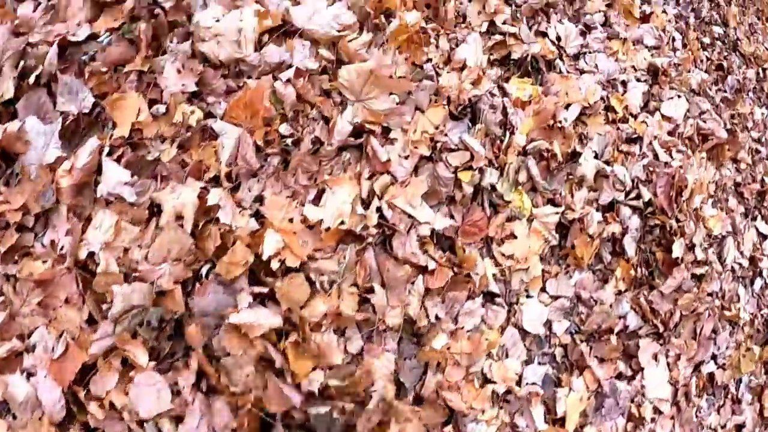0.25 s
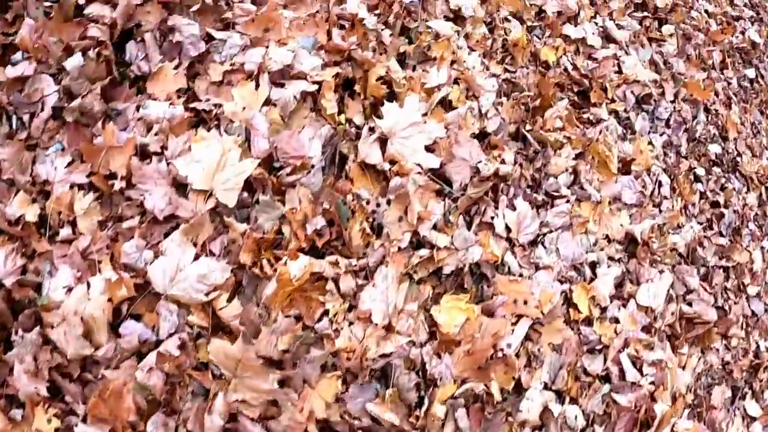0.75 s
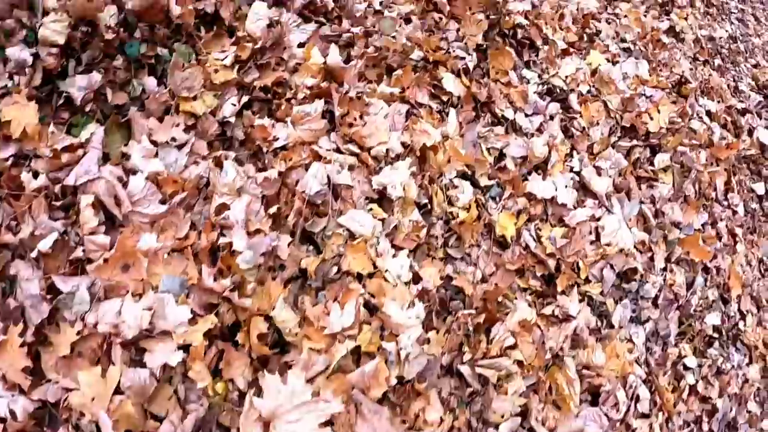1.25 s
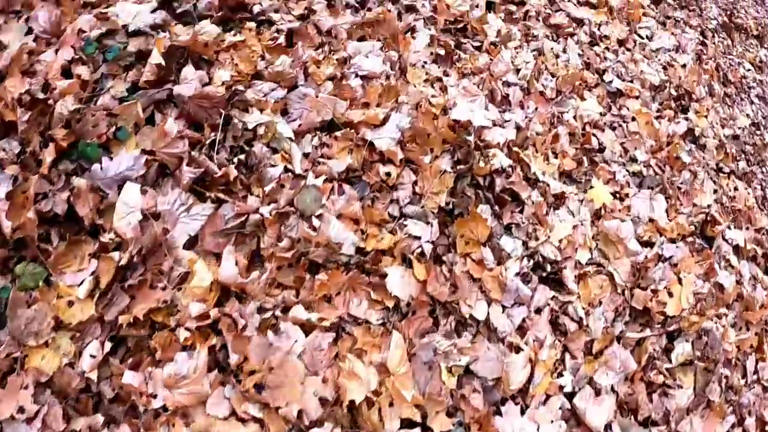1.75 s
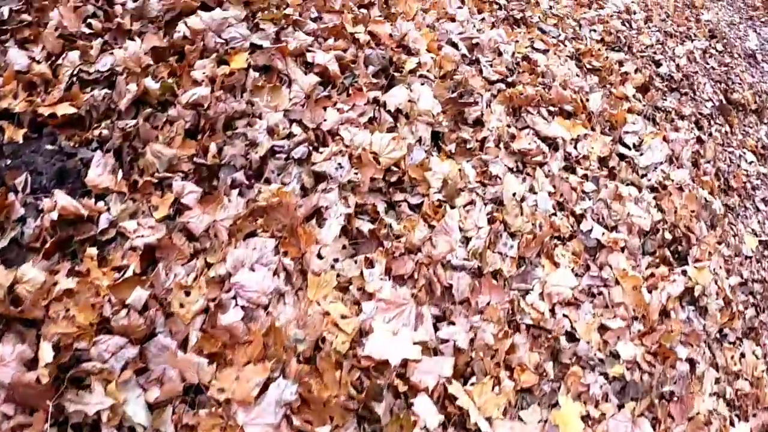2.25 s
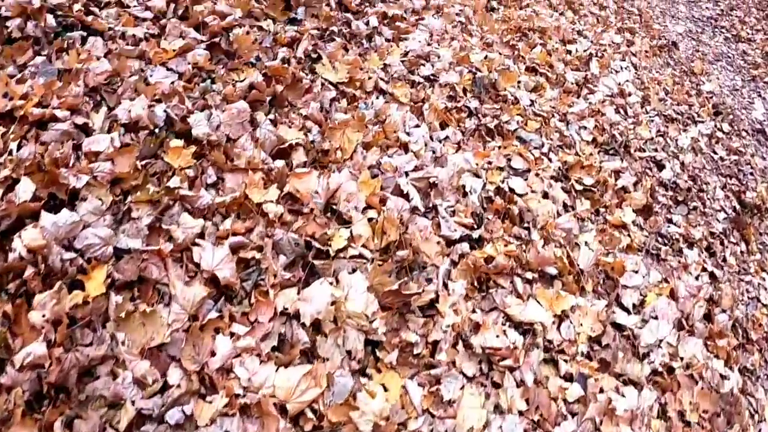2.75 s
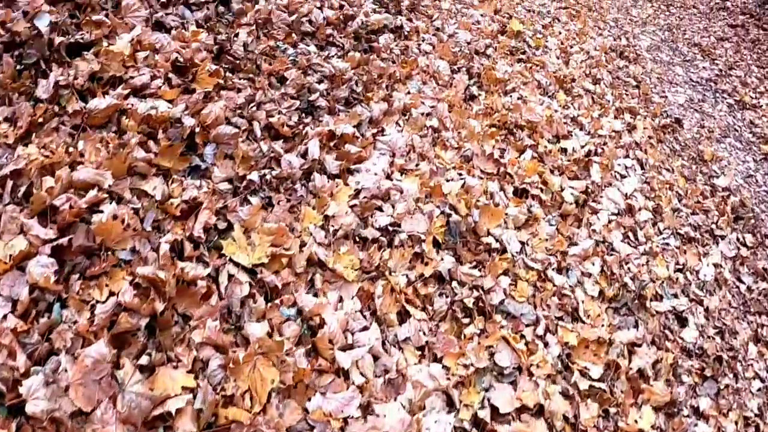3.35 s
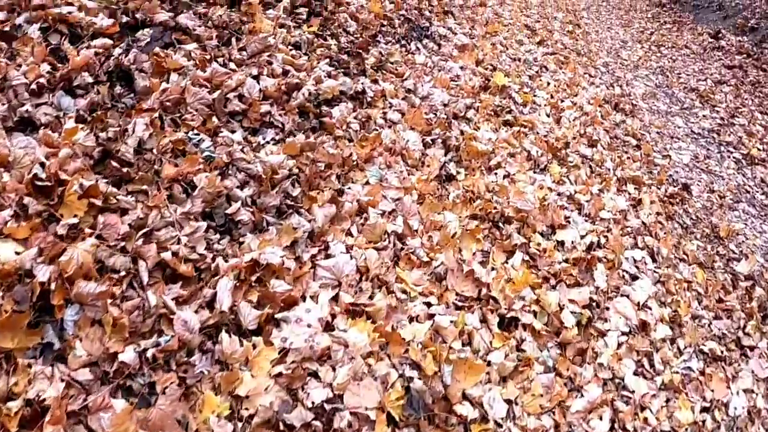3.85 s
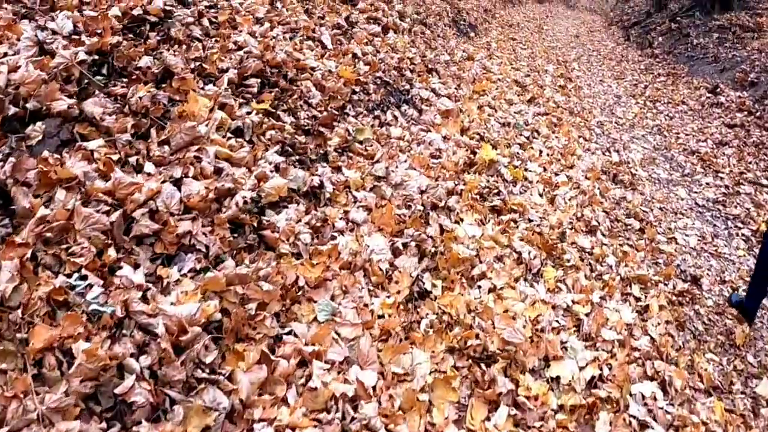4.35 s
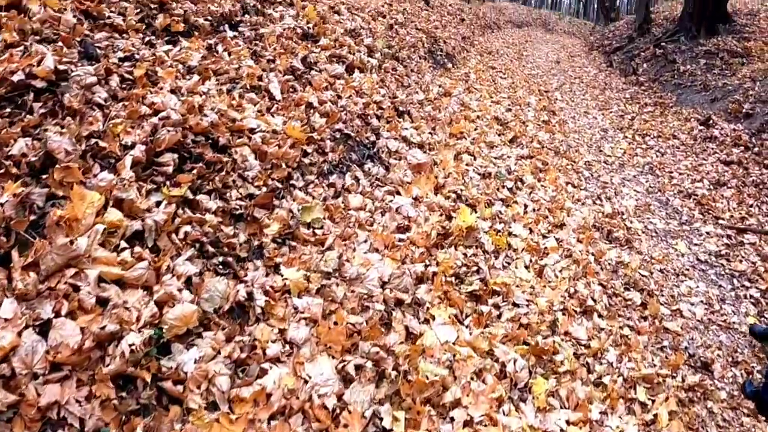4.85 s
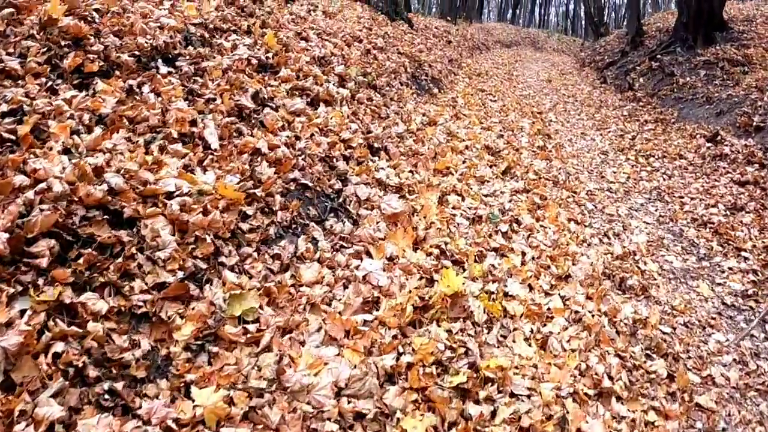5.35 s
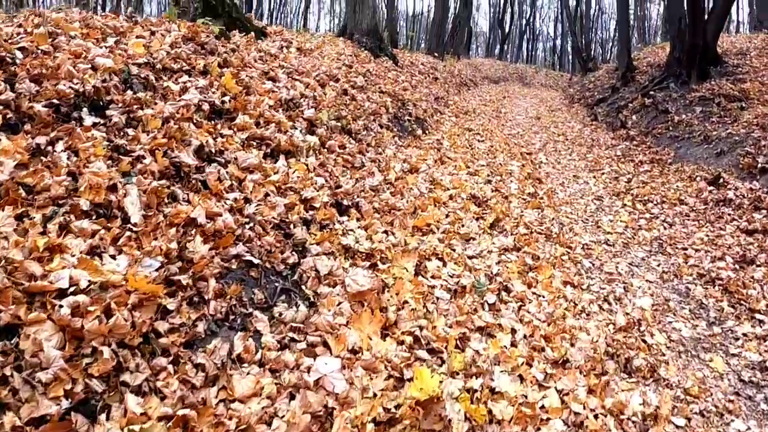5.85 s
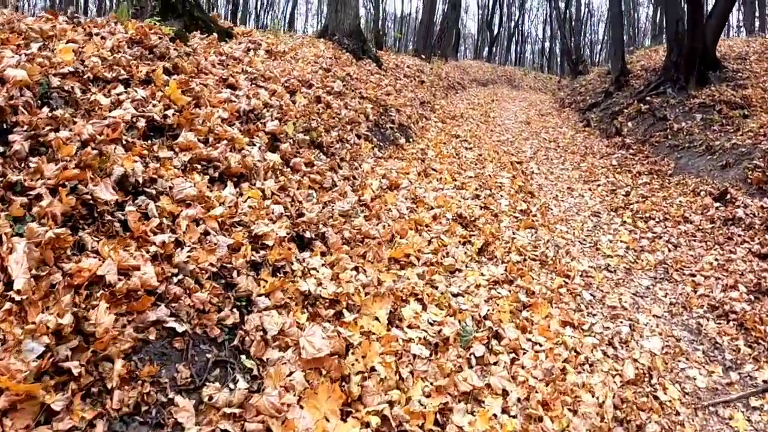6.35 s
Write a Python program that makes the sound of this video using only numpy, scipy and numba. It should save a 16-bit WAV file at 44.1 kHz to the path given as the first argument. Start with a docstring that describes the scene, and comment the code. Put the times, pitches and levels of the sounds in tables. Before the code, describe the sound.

Someone walks at an even pace through thick crisp fallen leaves, each step a swish and crunch, over a very faint low outdoor murmur.

```python
"""A forest path deep in dry leaves: someone walks along it at a fairly even pace, phone in hand.
Each step ploughs and crushes the layer: thousands of tiny fractures, each a short decaying ring, merge
into a rustle. Loose leaves tick, a dozen stalks snap, and dull low bumps sound as short cosine pulses.
Far-off engines drone as two wavering low tones, each with a weaker octave, under the quiet of the wood,
which is filtered noise. One soft low tone slides down late on."""
import sys
import numpy as np
from scipy import signal
from scipy.fft import rfft, irfft, next_fast_len
from scipy.io import wavfile
from numba import njit

SR = 44100
rng = np.random.default_rng(int(sys.argv[2]) if len(sys.argv) > 2 else 0)


def dump_mix(stems):
    """Bounce the given channels to the path in sys.argv[1] as a 16-bit WAV at rate SR."""
    frames = np.atleast_2d(stems).T  # one column per channel
    limited = np.clip(frames, -1, 1)  # hard clip at full scale
    pcm = np.round(limited * 32767).astype(np.int16)
    wavfile.write(sys.argv[1], SR, pcm)


N = 291501
TIME = np.arange(N) / SR  # s

# Spectrum of the murmur of the open air: (f/Hz, relative level/dB per Hz)
WOOD_SPECTRUM = [(15, -7), (28, -6), (50, 4), (100, 2), (200, -1), (320, -6), (500, -12), (1500, -28),
                 (6000, -16), (15000, -33)]
# Distant engines at rest: (t/s, firing rate f/Hz, relative level/dB)
IDLING = [(0, 38.7, -52), (.4, 39.4, -54.5), (1.6, 38.3, -64), (2.4, 38.5, -58), (4.4, 38.6, -50.5),
          (5, 39, -58), (5.5, 38.6, -52), (6.6, 39.5, -59)]
# Distant engines under load: (t/s, firing rate f/Hz, relative level/dB)
PULLING = [(3.5, 48.5, -52), (3.9, 49.7, -48.5), (4.3, 54.8, -44), (4.6, 59.6, -54.5), (4.9, 60.2, -55.5)]
# Dull low bumps, the first very faint: (t/s, level/dB, f/Hz)
BUMPS = [(2.86, -39, 90), (4.298, -24.5, 172)]
# Stalks and stiff leaves that snap: (t/s, relative level/dB, ring f/Hz)
SNAPS = [(0.359, -11.5, 2270), (0.501, -21.5, 3000), (1.117, -19, 1490), (1.333, -24, 1890),
         (1.612, -6, 2550), (1.834, -13, 2300), (2.709, -11, 2800), (3.314, -20, 2150), (3.886, -23, 3280),
         (4.936, -14, 2820), (5.348, -17, 2480), (6.271, -21, 960)]
# Spectrum of the rustling layer: (f/Hz, relative level/dB per Hz)
LEAF_SPECTRUM = [(41, -25), (70, -6), (110, -14), (196, -7.5), (344, -7.5), (504, -4.5), (863, -5.5),
                 (1130, -2.5), (1580, -2), (3310, -1.5), (4640, -2), (7100, -6.5), (8310, -10.5),
                 (12400, -21.5), (14900, -26.5)]
# How heavily the foot packs the leaves underneath: (t/s, low thud level/dB)
WEIGHT = [(0, -2.5), (4.4, 2), (6.6, 1.5)]
# How widely the moving leaves lie around the phone: (t/s, spread of directions 0-1)
SPREAD = [(0, 0.43), (3.75, 0.42), (4.05, 0.27), (6.6, 0.2)]
# Strides, in which the foot swings through the leaves, presses them down and leaves them:
# (start t/s, swing/s, press/s, relative level/dB at the start, on landing and at the end of the press,
#  release/s, crispness/dB on landing, crispness/dB once trodden)
STEPS = [(-0.2, 0.24, 0.22, -30, -25, -24.5, 0.11, 4, -1.5),
         (0.51, 0.24, 0.3, -44, -25, -26.5, 0.039, 2.5, -2.5),
         (1.17, 0.31, 0.25, -40.5, -22.5, -25, 0.093, -2, 0.3),
         (1.99, 0.15, 0.29, -42, -24.5, -27, 0.11, -1, -1),
         (2.599, 0.23, 0.27, -40.5, -24, -23.5, 0.09, -1.5, -0.5),
         (3.35, 0.2, 0.25, -45, -26, -27, 0.075, 1, -0.2),
         (4.03, 0.3, 0.21, -40, -26.7, -27, 0.067, 0.5, -2),
         (4.76, 0.18, 0.29, -44, -33, -26.5, 0.066, 3.5, -1),
         (5.58, 0.092, 0.31, -44, -30.5, -29, 0.069, 2.5, 0.5),
         (6.268, 0.21, 0.24, -42.5, -29, -26.5, 0.06, 0.5, 3)]
# Short flicks of a toe or heel at the edges of the steps: (t/s, half length/s, relative level/dB)
FLICKS = [(0.41, 0.028, -30.5), (1.131, 0.018, -31), (1.83, 0.013, -35), (1.994, 0.041, -35),
          (2.45, 0.011, -32.5), (3.495, 0.015, -34), (3.82, 0.012, -34.5), (4.654, 0.041, -33.5),
          (5.28, 0.013, -31), (5.363, 0.02, -35), (5.529, 0.04, -39), (6.102, 0.017, -34)]
# Leaves that go on stirring between the steps: (t/s, relative level/dB)
STIRRING = [(0.5, -45), (1.2, -42.5), (3.3, -39.5), (4, -44), (6.6, -45)]
# Direction of the rustle as the phone slowly turns: (t/s, left minus right level/dB)
TURN = [(0, 3), (0.9, 2), (3.7, 3.5), (4.4, 4), (6.6, 4.5)]
# Swing of the rustle to the left as a foot comes forward: right foot, left foot (level/dB)
FOOT_PAN_DB = [1.0, 2]
# Colour of the two microphone ports: (f/Hz, level/dB)
LEFT_PORT = [(300, -2.5), (1000, 1.5), (1500, 0.37), (2500, 2), (5500, -1), (7100, -0.5), (8050, -9.5),
             (9500, 2), (12400, 2.8), (14000, 0)]
RIGHT_PORT = [(300, -1.5), (1000, 0.9), (1500, -1.3), (2500, -1.5), (5500, 0.3), (7600, 2), (8200, 0),
              (9800, 1), (12400, 3.5), (14000, 2.5)]

PAN_WAIT_S, PAN_RISE_S, PAN_FALL_S = 0.082, 0.15, 0.5  # counted from the end of the press before
LIFT_S, FRESH_DB = 0.02, 0.4  # fade-in and crispness of the leaves as the foot lifts
TRODDEN_LAG_S = 0.078  # the leaves lie flattest just after the press
BODY_PRESS_DB, BODY_SWING_DB = 0.02, -1.3  # body of the layer under full weight, with the foot in the air
RELEASE_BEND = 1.14  # above 1 the rustle dies ever faster as the foot leaves
TOP_HZ = 14900


def undb(db):
    """Level law: decibels to amplitude gain."""
    return 10 ** (np.asarray(db) / 20)


def unit(x):
    """Normalisation: scale to rms 1."""
    return x / np.sqrt(np.mean(x ** 2))


def curves(table):
    """Linear interpolation: the columns of a table, joined by straight lines in time."""
    s, *columns = np.transpose(table)
    return [np.interp(TIME, s, c) for c in columns]


def walk(per_s):
    """Random modulation: Gaussian values drawn per_s times a second, joined by straight lines."""
    knots = np.arange(0, TIME[-1] + 1, 1 / per_s)
    return np.interp(TIME, knots, rng.standard_normal(len(knots)))


def band(x, lo_hz, hi_hz):
    """Zero-phase filtering: a band-pass run forwards and backwards."""
    edges = [lo_hz, min(hi_hz, SR / 2 - 1)]
    return signal.sosfiltfilt(signal.butter(2, edges, "band", fs=SR, output="sos"), x)


def colour(x, points):
    """Minimum phase: a causal filter with the given (f/Hz, level/dB) response, by way of the cepstrum."""
    hz, db = np.transpose(points)
    size = 2 * next_fast_len(N)
    bins = np.maximum(np.arange(size // 2 + 1) * SR / size, 1)
    response_db = np.interp(np.log(bins), np.log(hz), db)
    cepstrum = irfft(np.log(undb(response_db)))
    # folding the cepstrum onto positive times makes the filter causal
    cepstrum[1:size // 2] *= 2
    cepstrum[size // 2 + 1:] = 0
    return irfft(rfft(x, size) * np.exp(rfft(cepstrum)))[..., :N]


@njit
def grains(start, hz, cycles, size):
    """Damped oscillation: a sum of rings; start in samples, cycles until 1 / e."""
    out = np.zeros(N)
    for k in range(len(start)):
        decay = hz[k] / (cycles[k] * SR)
        pole = 2j * np.pi * hz[k] / SR - decay
        first = int(np.ceil(start[k]))
        z = size[k] * np.exp(pole * (first - start[k]))
        p = np.exp(pole)
        for i in range(max(first, 0), min(N, first + int(5 / decay) + 1)):
            out[i] += z.imag * min((i - start[k]) / 3, 1.)  # onset over three samples
            z *= p
    return out


def wood(level_db=-54, side_db=-9, buffet_db=-59):
    """Diffuse field: a low murmur of open air, and slight buffeting of the moving phone, separate at each port."""
    mid, side = unit(colour(rng.standard_normal((2, N)), WOOD_SPECTRUM))
    murmur = mid + undb(side_db) * np.array([side, -side])
    buffet_spectrum = [(10, 0), (25, 0), (60, -7), (150, -21), (1000, -60)]
    buffet = unit(colour(rng.standard_normal((2, N)), buffet_spectrum))
    return undb(level_db) * murmur + undb(buffet_db) * buffet


def engine(table, gain_db, second_db, fade_s, waver_db):
    """Propagation: only the firing tone and its octave carry this far, wavering on the way through the air."""
    hz, db = curves(table)
    phase = 2 * np.pi * (np.cumsum(hz) / SR + rng.random())
    waver = np.interp(TIME, np.linspace(0, TIME[-1], 60), rng.standard_normal(60))
    # seconds before the first or after the last row of the table
    outside = np.maximum(table[0][0] - TIME, 0) + np.maximum(TIME - table[-1][0], 0)
    gain = np.sqrt(2) * undb(db + gain_db + waver_db * waver) * np.exp(-outside / fade_s)
    return gain * (np.sin(phase) + undb(second_db) * np.sin(2 * phase))


def low_tone(start_s=5.905, length_s=0.14, from_hz=240, to_hz=192, level_db=-38.0):
    """Frequency glide: one short, soft, low tone slides down as a step ends."""
    along = np.clip((TIME - start_s) / length_s, 0, 1)
    phase = 2 * np.pi * np.cumsum(from_hz + (to_hz - from_hz) * along) / SR
    return undb(level_db) * np.sin(np.pi * along ** 0.66) * np.sin(phase)


def bumps(cycles=1.0):
    """Gaussian pulse: a dull low bump is a cosine that swells and dies within a few periods."""
    total = np.zeros(N)
    for s, db, hz in BUMPS:
        since = TIME - s
        envelope = np.exp(-(since * hz / cycles) ** 2)
        total -= undb(db) * np.cos(2 * np.pi * hz * since) * envelope
    return total


def settling(per_s=40, level_db=-34, scatter_db=4, cycles=0.35):
    """Random impacts: kicked leaves fall back and tick one by one, at any moment of the walk."""
    when, stiffness, strength, side, sign = rng.random((int(per_s * N / SR), 5)).T
    hz = 1000 * 2 ** (2.7 * stiffness)
    size = undb(level_db + scatter_db * np.minimum(-np.log(strength), 3)) * np.sign(sign - .5)
    ring = np.full(len(hz), cycles)
    ports = []
    for ear in (.5, -.5):  # left, right; side 0 is sooner and louder at the left port
        start = when * N + ear * (2 * side - 1)
        ports.append(grains(start, hz, ring, size * (1 + ear * (1 - side))))
    return band(np.array(ports), 360, 7000)


def snaps(cycles=1.0, gain_db=-2.5, splinter_s=0.00358, splinter_db=-8):
    """Brittle fracture: a stalk breaks with one sharp tick, and a smaller splinter follows."""
    s, db, hz = np.transpose(SNAPS)
    wait, detune = rng.random((len(s), 2)).T
    ring = np.full(len(s), cycles)
    tick = grains(s * SR, hz, ring, undb(db + gain_db))
    splinter_start = (s + splinter_s * wait) * SR
    splinter = grains(splinter_start, hz * (.5 + detune), ring, undb(db + splinter_db))
    return band(tick + splinter, 650, 9000)


def bearing(ahead_db=3.0):
    """Interaural level difference: how far left the rustle lies, in dB; the feet take turns."""
    pan_db, = curves(TURN)
    for k, (s, swing, press, *_) in enumerate(STEPS):
        times = s + swing + press + np.cumsum([PAN_WAIT_S, PAN_RISE_S, PAN_FALL_S])
        pan_db = pan_db + np.interp(TIME, times, [0, FOOT_PAN_DB[k % 2], 0])
    return pan_db - ahead_db


def crush():
    """Addition of powers: strides, flicks and stirring sum to the level of the rustle in dB."""
    power = undb(curves(STIRRING)[0]) ** 2
    for s, swing, press, start_db, land_db, end_db, release, *_ in STEPS:
        end = s + swing + press
        lift = np.maximum(s - TIME, 0) / LIFT_S
        leave = (np.maximum(TIME - end, 0) / release) ** RELEASE_BEND
        stride_db = np.interp(TIME, [s, s + swing, end], [start_db, land_db, end_db])
        power = power + (undb(stride_db) * np.exp(-lift - leave)) ** 2
    for s, half, db in FLICKS:
        power = power + undb(db) ** 2 * np.exp(-((TIME - s) / half) ** 2)
    return 10 * np.log10(power)


def depth():
    """Compaction: body and crispness of the layer in dB as the foot swings, lands and treads it down."""
    body, crisp = [], []
    for s, swing, press, *_, crisp_db, trodden_db in STEPS:
        land = s + swing
        body += [(s, BODY_SWING_DB), (land, BODY_PRESS_DB), (land + press / 2, BODY_PRESS_DB)]
        crisp += [(s + LIFT_S, FRESH_DB), (land, crisp_db), (land + press + TRODDEN_LAG_S, trodden_db)]
    return curves(body)[0], curves(crisp)[0]


def crumple(per_s, burst_s, cycles, scatter_db, count,
            lag_ahead=0.23, lag_per_db=0.58, lag_spread=0.84, pan_spread_db=4.5):
    """Crackling noise: leaves buckle in bursts of count fractures, each leaf with its own size, pitch and place."""
    leaves = int(per_s * N / SR)
    chance = rng.random((leaves, 5 + 4 * count)).T
    when, stiffness = chance[:2]
    strength, side, tilt = np.sqrt(3) * (2 * chance[2:5] - 1)
    wait, force, detune, sign = chance[5:].reshape(4, count, leaves)
    at = (when * N).astype(int)
    start = (at + wait * burst_s * SR) % N
    hz = (120 + 15000 * stiffness ** 1.4) * (.75 + .5 * detune)
    # high rings are shorter, so they start stronger: the heap as a whole is even in pitch
    size = undb(scatter_db * strength) * (.5 + force) * np.sign(sign - .5) * hz ** .64
    # a leaf on the left reaches the left port sooner (lag in samples); levels scatter between the ports
    spread = np.abs(curves(SPREAD)[0][at])
    lag = lag_ahead - lag_per_db * bearing()[at] + lag_spread * np.sqrt(spread) * side
    pan_db = pan_spread_db * spread * tilt
    ring = np.full(hz.size, cycles)
    ports = []
    for ear in (.5, -.5):  # left, right
        port_size = size * undb(ear * pan_db)
        ports.append(grains((start + ear * lag).ravel(), hz.ravel(), ring, port_size.ravel()))
    return unit(np.array(ports))


def footsteps(level_db=-0.71, uneven_db=0.6, patchy_db=0.5, weight_share=0.11):
    """Superposition: rubbing, crunch and scrapes follow the foot, their body and treble set by the tread."""
    crush_db = crush() + uneven_db * walk(per_s=30)
    weight_db, = curves(WEIGHT)
    body_db, crisp_db = depth()
    pan_db = bearing()
    rubbing = crumple(per_s=14000, burst_s=.02, cycles=1.31, scatter_db=2.5, count=4)
    crunch = crumple(per_s=2200, burst_s=.004, cycles=1.0, scatter_db=3.0, count=3)
    # curled, stiff leaves ring longer as they scrape past each other
    scrapes = crumple(per_s=550, burst_s=.03, cycles=21.0, scatter_db=1.0, count=4)
    # the coarse fractures happen under the top leaves, which muffle them
    rustle = rubbing + undb(-6) * band(crunch, 220, 4060) + undb(-7.5) * band(scrapes, 1270, 8000)
    rustle = band(colour(rustle, LEAF_SPECTRUM), 62, 15000)
    rustle /= np.std(band(rustle.mean(axis=0), 900, 9000))
    # thud, body and crispness each raise or lower one band of the rustle
    rustle = rustle + band(rustle, 90, 320) * (undb(weight_db) - 1)
    hollow_db = body_db + weight_share * weight_db + patchy_db * walk(per_s=16)
    rustle = rustle + band(rustle, 160, 1280) * (undb(hollow_db) - 1)
    rustle = rustle + band(rustle, 3500, 17000) * (undb(crisp_db + 0.5) - 1)
    return rustle * undb(level_db + crush_db + np.array([pan_db, -pan_db]) / 2)


def scene():
    """Linear superposition: the steps close by over the distant drone."""
    idling = engine(IDLING, gain_db=3.0, second_db=-12, fade_s=0.3, waver_db=1.5)
    pulling = engine(PULLING, gain_db=0.5, second_db=-14, fade_s=0.091, waver_db=4.0)
    background = wood() + idling + pulling + low_tone()
    return background + bumps() + settling() + snaps() + footsteps()


def record(dry):
    """Transducer response: each port colours the sound in its own way; the phone cuts the top."""
    ports = np.array([colour(dry[0], LEFT_PORT), colour(dry[1], RIGHT_PORT)])
    return signal.sosfilt(signal.ellip(10, .2, 80, TOP_HZ, fs=SR, output="sos"), ports)


dry = scene()
out = record(dry)
dump_mix(out)
```